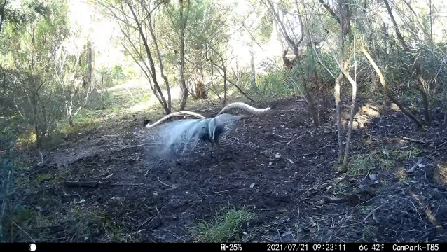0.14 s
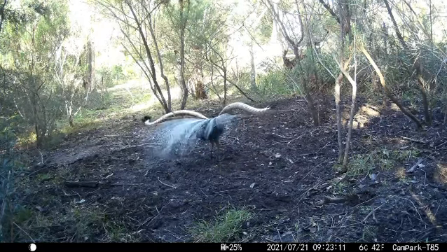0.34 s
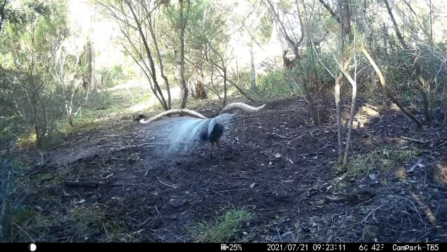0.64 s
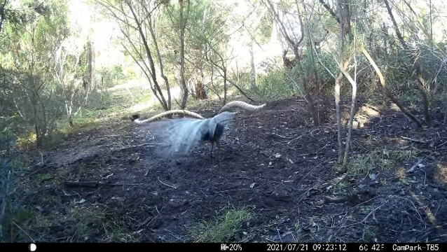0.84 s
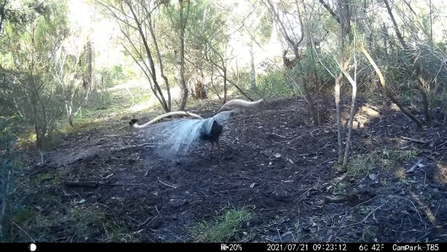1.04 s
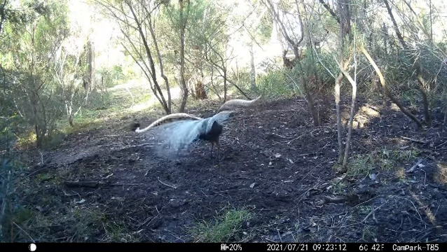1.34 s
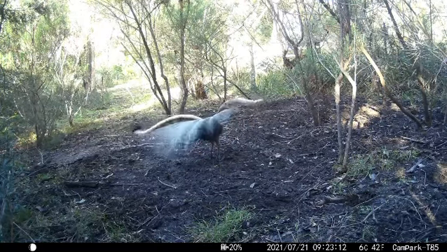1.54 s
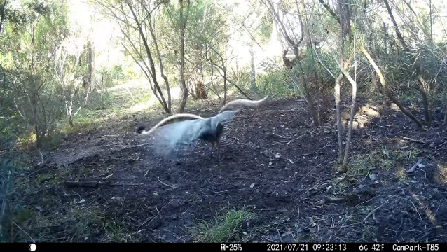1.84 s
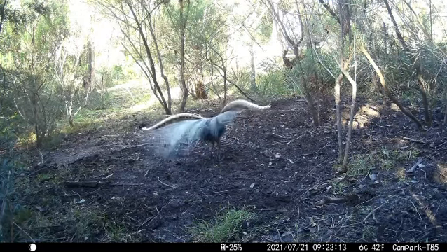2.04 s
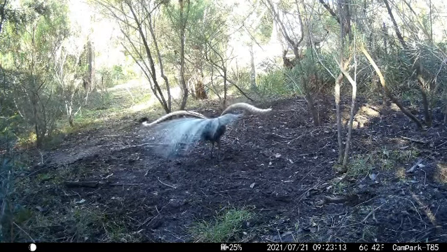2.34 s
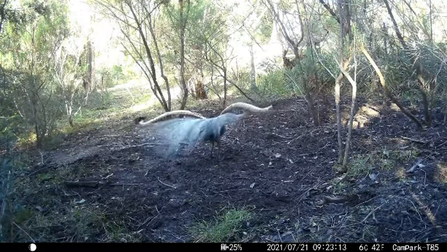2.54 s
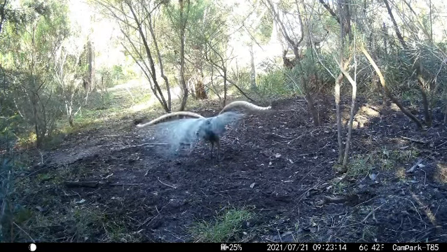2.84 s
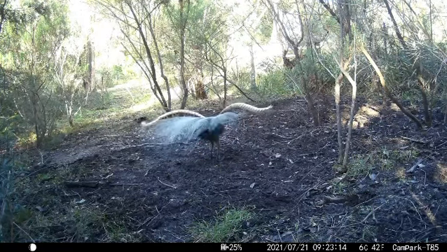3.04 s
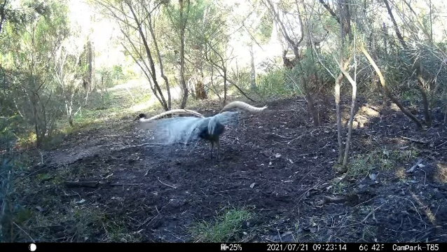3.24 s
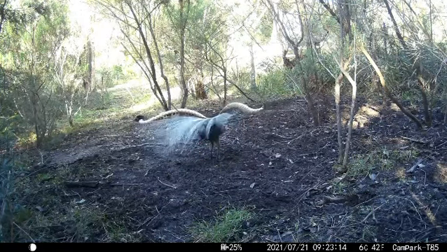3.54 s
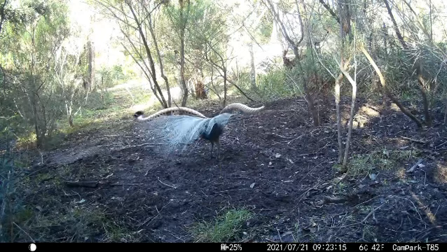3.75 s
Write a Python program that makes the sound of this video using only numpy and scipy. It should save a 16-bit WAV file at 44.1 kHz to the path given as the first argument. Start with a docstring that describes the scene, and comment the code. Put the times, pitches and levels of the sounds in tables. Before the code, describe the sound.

Displaying lyrebird rasps four times, screeches three times and ends with three rich, warbling whistles outdoors.

```python
"""A lyrebird displays in a quiet forest. Its tail feathers rustle (coloured noise, two flicks) as it gives
four fluttering rasps of chaotic puffs. Three screeches follow, chaos of which the last two lock into a pitch.
Three swooping whistles end the display: harmonics from two sides of the syrinx, beating against each other.
Throughout, the ground and trees answer faintly (decaying noise echoes) over a low noise floor."""
import sys
import numpy as np
from scipy import signal
from scipy.fft import rfft, irfft, next_fast_len
from scipy.io import wavfile
from scipy.ndimage import uniform_filter1d, map_coordinates

SR = 44100
rng = np.random.default_rng(int(sys.argv[2]) if len(sys.argv) > 2 else 0)


def generate_wav(sig):
    """Save sig (samples, or channels by samples) to the path in sys.argv[1] as 16-bit PCM at SR."""
    pcm = np.round(np.clip(np.atleast_2d(sig).T, -1, 1) * 32767).astype(np.int16)
    wavfile.write(sys.argv[1], SR, pcm)


N = 171990
TOP_HZ = 14600  # band limit

# spectrum of the rasps and of the tail rustle: freq_hz, relative_level_db
RASP_SPECTRUM = [(240,-53),(500,-26),(940,-21.5),(1290,-9.5),(1800,-7),(2150,-9),(2700,-6),(3200,-13),(4100,-9.5),(4800,0),(5400,-0.5),(6100,-5),(7700,-3.5),(9100,-13.5),(13100,-21.5),(14500,-33)]


def amp(db):
    """Decibels to amplitude."""
    return 10 ** (np.asarray(db) / 20)


def unit(x):
    """Scale to rms 1."""
    return x / np.sqrt(np.mean(x ** 2) + 1e-20)


def clock():
    """Time of each sample, s."""
    return np.arange(N) / SR


def along(points, hz):
    """Interpolate (Hz, value) points on a log frequency axis."""
    f, v = np.transpose(points)
    return np.interp(np.log(hz + 1), np.log(f + 1), v)


def curves(rows):
    """One value per sample for each column after the time."""
    s, *cols = np.transpose(rows)
    return [np.interp(clock(), s, c) for c in cols]


def wobble(knots_per_s):
    """Smooth random curve through normally distributed knots."""
    knots = rng.standard_normal(int(N * knots_per_s / SR) + 4)
    return map_coordinates(knots, [np.arange(N) * knots_per_s / SR])


def phase_of(hz):
    """Integrate frequency to phase, rad."""
    return 2 * np.pi * np.cumsum(hz) / SR


def gate(start_s, end_s, edge_s):
    """1 between two times, with soft tanh edges."""
    opening = 1 + np.tanh((clock() - start_s) / edge_s)
    closing = 1 + np.tanh((end_s - clock()) / edge_s)
    return opening * closing / 4


def filtered(x, response):
    """Multiply the spectrum of x by a function of frequency."""
    m = next_fast_len(N + SR // 2)
    return irfft(rfft(x, m) * response(np.fft.rfftfreq(m, 1 / SR)), m)[:N]


def noise(spectrum, drive=1):
    """Coloured noise of rms 1, pulsed by drive before it is coloured."""
    return unit(filtered(drive * rng.standard_normal(N), lambda hz: amp(along(spectrum, hz))))


def envelope(calls, release_s):
    """Each call ramps up from silence, swells to its level, then dies by 20 dB per release_s."""
    t = clock()
    total = 0
    for start_s, attack_s, end_s, level_db, swell_db_per_s in calls:
        attack = np.clip((t - start_s) / attack_s, 0, 1) ** 1.56
        swell_db = swell_db_per_s * (np.clip(t, start_s, end_s) - end_s)
        release_db = 20 * np.maximum(t - end_s, 0) / release_s
        total = total + attack * amp(level_db + swell_db - release_db)
    return total


def chaos(spectrum, pulse_hz, scatter, sharpness):
    """Irregular puffs of the syrinx through the throat's resonances, each of which flares on its own."""
    flare_db = 2  # rms
    pulses = np.exp(sharpness * np.cos(phase_of(pulse_hz * (1 + scatter * wobble(900)))))
    z = signal.stft(noise(spectrum, pulses), nperseg=128)[2]
    flare = uniform_filter1d(rng.standard_normal(z.shape), size=3, axis=0)  # across frequency
    flare = uniform_filter1d(flare, size=9, axis=1)  # across time
    return unit(signal.istft(z * amp(flare_db * unit(flare)), nperseg=128)[1][:N])


def rasps():
    """Chaotic puffs that flutter some fifty times a second."""
    # dry rasps: start_s, attack_s, end_s, level_at_end_db, swell_db_per_s
    rasp_calls = [(-.03, .02, 0.11, -27, -12), (.398, 0.035, 0.51, -27.5, 50),
                  (.79, 0.06, 0.9217, -30.5, 89), (1.066, 0.038, 1.167, -30, 80)]
    release_s, flutter_hz, flutter_depth = 0.022, 52, 0.2
    flutter = 1 + flutter_depth * np.sin(phase_of(flutter_hz * (1 + 0.11 * wobble(20.6))))
    puffs = chaos(RASP_SPECTRUM, pulse_hz=798.7, scatter=.4, sharpness=1.3)
    return envelope(rasp_calls, release_s) * unit(flutter) * puffs


def feathers():
    """The shivering tail rustles as coloured noise; two flicks of the quills decay exponentially."""
    # tail rustle: time_s, level_db
    rustle_levels = [(0, -44), (.22, -55.5), (.32, -50.5), (.58, -56.5), (.65, -53.5), (.78, -60),
                     (1.0, -67)]
    # quill flicks: start_s, level_db, t60_s
    quill_flicks = [(0.391, -29, .02), (.549, -41.5, 0.066)]
    # flick spectrum: freq_hz, relative_level_db
    flick_spectrum = [(500, -15), (1500, -12), (2700, 3.5), (3600, -9), (5200, -2), (7800, -12),
                      (9500, -22), (14000, -30)]
    level_db, = curves(rustle_levels)
    rustle = amp(level_db + 1.5 * wobble(100)) * noise(RASP_SPECTRUM)
    t = clock()
    flicks = 0
    for start_s, flick_db, t60_s in quill_flicks:
        flicks = flicks + amp(flick_db - 60 * np.maximum(t - start_s, 0) / t60_s) * (t >= start_s)
    return rustle + flicks * noise(flick_spectrum)


def forest(x):
    """Quick scatter from the ground and a faint tail from the trees: x convolved with decaying noise."""
    # decay of the tail: freq_hz, t60_s
    tail_decay = [(500, 0.93), (2000, 0.47), (5000, 0.47), (12000, 0.19)]
    trees_db, ground_db, ground_t60_s = -30, -19, 0.15
    hz, t, z = signal.stft(rng.standard_normal(SR), SR, nperseg=256)
    decay = amp(-60 * t / along(tail_decay, hz)[:, None])
    trees = signal.istft(z * decay, SR, nperseg=256)[1][:SR]
    ground = rng.standard_normal(SR) * amp(-60 * clock()[:SR] / ground_t60_s)
    answer = amp(trees_db) * trees / np.linalg.norm(trees)
    answer = answer + amp(ground_db) * ground / np.linalg.norm(ground)
    return signal.fftconvolve(x, answer)[:N]


def noise_floor():
    """Steady noise, strongest in the bass."""
    # floor spectrum: freq_hz, relative_level_db
    floor_spectrum = [(15, -37.5), (25, -15), (60, -6.5), (161, -7), (205, -11.5), (240, -11), (260, -12.5),
                      (420, -18.5), (506, -20), (1010, -27.5), (8070, -37), (14500, -31)]
    floor_db = -56  # rms
    return amp(floor_db) * noise(floor_spectrum)


def screeches():
    """Chaos that locks into a jittery tone, roughened by a sagging undertone, until its period doubles."""
    # screeches: start_s, attack_s, end_s, level_at_end_db, swell_db_per_s
    screech_calls = [(1.66, 0.069, 1.764, -21, 59.5), (1.93, 0.069, 2.115, -21, 3),
                     (2.284, 0.051, 2.472, -17.5, 28)]
    # spectrum of the chaos: freq_hz, relative_level_db
    screech_spectrum = [(240,-58),(874,-27.5),(1230,-13.5),(1500,-14.5),(1770,-5.5),(2350,-3.5),(3100,-6),(4000,-4),(4800,1.5),(5900,-6.5),(7600,-8),(9000,-12),(13500,-21.5),(14500,-40)]
    # tone inside the screeches: time_s, pitch_hz, tonal_power_share (0-1)
    tone_track = [(1.70, 1800, .05), (1.77, 1728, 0.07), (1.98, 1680, 0.05), (2.004, 1750, 0.52),
                  (2.03, 1700, .85), (2.075, 1775, 0.95), (2.092, 1740, 0.88), (2.115, 1600, 0.37),
                  (2.32, 1779, .2), (2.36, 1850, .6), (2.39, 1936, 0.83), (2.416, 1918, 0.97),
                  (2.44, 1913, 0.91), (2.46, 1840, 0.86), (2.478, 1678, 0.5)]
    # spectrum of the tone: freq_hz, relative_level_db
    tone_spectrum = [(900, -27), (1700, 0), (2000, -3.5), (2700, -2), (3500, -10), (3850, 2.5),
                     (4500, -4.5), (5300, 0), (6500, -9), (7700, -2.5), (8700, -16), (9700, -7),
                     (14000, -32.5)]
    # period doubling: start_s, end_s
    doubling_spans = [(2.046, 2.1), (2.407, 2.475)]
    # other side of the syrinx, sagging until the period doubles: time_s, pitch_hz
    undertone_track = [(1.97, 1280), (2.045, 960), (2.31, 1350), (2.405, 1010)]
    release_s = .022
    undertone_peak_db, undertone_depth = -25, .7  # its own level; how deeply it modulates the tone
    doubled_db = 0  # lines halfway between the harmonics

    pitch_hz, share = curves(tone_track)
    share = np.clip(share, 0, 1)
    doubled = sum(gate(a, b, edge_s=0.0017) for a, b in doubling_spans)
    jitter = .007 * wobble(200) + .05 * (1 - share) * wobble(700)
    half_phase = phase_of(pitch_hz / 2 * (1 + jitter))
    undertone_hz = curves(undertone_track)[0] * (1 + .025 * wobble(500))
    undertone = np.sin(phase_of(undertone_hz)) * (1 - doubled)
    tone, power = 0, 0
    for k in range(1, 17):  # multiples of half the pitch
        gain = amp(along(tone_spectrum, k * pitch_hz / 2) + 2.5 * wobble(70))
        if k % 2:
            gain = gain * amp(doubled_db) * doubled
        modulation = 1 + undertone_depth * undertone * (k > 2)
        tone = tone + gain * np.sin(k * half_phase) * modulation
        power = power + gain * gain / 2
    voiced = tone / np.sqrt(power) + amp(undertone_peak_db) * undertone
    rough = chaos(screech_spectrum, pulse_hz=907, scatter=.25, sharpness=0.76)
    return envelope(screech_calls, release_s) * (np.sqrt(share) * voiced + np.sqrt(1 - share) * rough)


def whistles():
    """The throat favours the second harmonic; the second voice beats with it and adds hiss to the overtones."""
    # fundamental, one list per whistle: time_s, pitch_hz
    pitch_tracks = [
        [(2.768, 1264), (2.80, 1025), (2.85, 889.5), (2.87, 778), (2.888, 590.4)],
        [(2.995, 1030), (3.025, 1080), (3.045, 740.6), (3.06, 690), (3.085, 862), (3.11, 818), (3.133, 754),
         (3.175, 810), (3.21, 912), (3.252, 962), (3.29, 881.5), (3.32, 770), (3.337, 590)],
        [(3.45, 1002), (3.472, 900), (3.483, 691), (3.497, 623.5), (3.52, 715), (3.534, 903), (3.575, 840),
         (3.605, 946), (3.64, 1038), (3.662, 1140), (3.70, 1102), (3.73, 1111), (3.76, 1075), (3.78, 972),
         (3.796, 870)],
    ]
    # loudness before trims, one list per whistle:
    # time_s, second_harmonic_db, overtones_near_3_khz_db, treble_db
    effort_tracks = [
        [(2.76, -67.5, -79, -72), (2.798, -44.5, -63, -49.5), (2.842, -24.5, -44, -45),
         (2.864, -32.5, -52, -43), (2.9, -61, -67, -66)],
        [(2.99, -60, -80, -73), (3.0, -46, -64, -58), (3.04, -27.5, -43, -48), (3.054, -35, -41.5, -35.5),
         (3.084, -22, -39, -37.5), (3.1, -19, -30.5, -34.5), (3.16, -26.5, -54.5, -39.5), (3.25, -21, -43, -35),
         (3.266, -13.5, -43, -35.5), (3.294, -17, -45, -34.5), (3.31, -23.5, -40, -35.5),
         (3.35, -49.5, -66, -63)],
        [(3.44, -57, -59, -73), (3.45, -45, -57, -52.5), (3.474, -24, -42, -42), (3.492, -33, -53, -42),
         (3.532, -17, -39.5, -33.5), (3.57, -13.5, -35, -41), (3.6, -12, -26.5, -24), (3.616, -11.5, -31, -31),
         (3.658, -18, -40, -30.5), (3.706, -10.5, -41.5, -32), (3.722, -16, -34, -28), (3.766, -17, -39, -35.5),
         (3.788, -9, -34, -30.5), (3.805, -44, -54.5, -44)],
    ]
    # other side of the syrinx, relative to the second harmonic: time_s, offset_hz, strength_db
    second_voice_track = [(2.79, -190, -7), (2.85, -120, -4), (2.88, -150, -6), (3.03, -100, -3),
                          (3.06, -100, -12.5), (3.088, -290, 4.5), (3.125, -190, 13), (3.175, -130, 4),
                          (3.21, -55.5, -3), (3.248, -40.5, -5.5), (3.275, 293, -14), (3.31, 267, 3),
                          (3.465, 80, -3), (3.52, 119, -10), (3.55, 99.5, -19), (3.605, -76.5, -19),
                          (3.625, -110, 1.5), (3.66, -150, -4.5), (3.705, -87, 0.5), (3.72, -94, -35),
                          (3.765, -81, -13), (3.785, -130, -5.5)]
    # spectrum of the overtones: freq_hz, relative_level_db
    overtone_spectrum = [(1900, 10), (2200, 4), (2800, 0.5), (3400, -7.5), (3900, -17.5), (4600, -6.5),
                         (5500, -12.5), (6100, -20.5), (7000, -6), (7800, -6), (8600, -21), (10000, -14),
                         (13000, -16), (14500, -25)]
    # spectrum of the hiss: freq_hz, relative_level_db
    hiss_spectrum = [(1000, -22), (2800, 0), (3700, -13), (4900, 2), (6100, -6), (7200, 3), (8600, -8),
                     (10000, -6), (13500, -12), (14500, -20)]
    # spectrum of the grain: freq_hz, relative_level_db
    grain_spectrum = [(400, -25), (700, -12.5), (1200, -6), (1800, 0.5), (2600, -4), (3300, -17),
                      (5000, -36)]
    fundamental_db = -37  # at the loudest whistling
    whistle_trim_db, overtone_trim_db, hiss_trim_db, grain_trim_db = -1, 0, -1.5, -11.5
    jitter, clash_jitter = 0.00297, .02  # pitch scatter: always; added when the voices clash
    clear_hiss = 0.11  # hiss of a clear note
    rough_beat_hz = 115  # slower beats leave the note clearer

    pitch_hz, = curves(sum(pitch_tracks, []))
    whistle_db, middle_db, treble_db = curves(np.vstack(effort_tracks))
    offset_hz, second_db = curves(second_voice_track)
    second = amp(second_db)
    clash = np.tanh(2 * second * np.minimum(np.abs(offset_hz) / rough_beat_hz, 1) ** 2)
    scatter = jitter * wobble(160) + clash_jitter * clash * wobble(800)
    phase = phase_of(uniform_filter1d(pitch_hz, size=300) * (1 + scatter))
    beat = phase_of(offset_hz * (1 + .12 * wobble(80)))

    def partial(k):
        """Harmonic k of both voices, scaled by their joint power."""
        pair = np.sin(k * phase) + second * np.sin(k * phase + k // 2 * beat)
        return pair * np.sqrt(2 / (1 + second ** 2))

    overtones = 0
    for k in range(3, 21):
        hz = k * pitch_hz
        high = np.clip((hz - 3400) / 800, 0, 1)  # crossfade from middle to treble
        level_db = middle_db + high * (treble_db - middle_db - 5 * clash) + along(overtone_spectrum, hz)
        level_db = level_db + 3.1 * high * wobble(21.99) + 2.0 * wobble(200)
        overtones = overtones + amp(level_db) * (hz < TOP_HZ) * partial(k)

    hiss = noise(hiss_spectrum, 1 + 0.8 * np.cos(phase))
    hiss = hiss * (clear_hiss + 0.64 * clash) * (1 - 0.5 * clash * np.cos(beat))
    grain = noise(grain_spectrum) * clash * amp(grain_trim_db + (whistle_db + treble_db) / 2)
    voice = amp(whistle_db + whistle_trim_db) * partial(2) + amp(overtone_trim_db) * overtones
    voice = voice + amp(treble_db + hiss_trim_db) * hiss + grain
    sounding = sum(gate(w[0][0], w[-1][0], edge_s=.005) for w in pitch_tracks)
    beak_open = sum(gate(e[0][0], e[-1][0], edge_s=.003) for e in effort_tracks)
    level_db = fundamental_db + 0.19 * (whistle_db - whistle_db.max()) + 1.4 * wobble(180)
    fundamental = amp(level_db) * np.sqrt(2) * np.sin(phase)
    return beak_open * voice + sounding * fundamental


def scene():
    """The bird, its echoes and the noise floor."""
    bird = rasps() + feathers() + screeches() + whistles()
    return (bird + forest(bird) + noise_floor())[None]


def record(dry):
    """Steep low-pass at the band limit."""
    return filtered(dry[0], lambda hz: 1 / np.sqrt(1 + (hz / TOP_HZ) ** 200))[None]


dry = scene()
out = record(dry)
generate_wav(out)
```